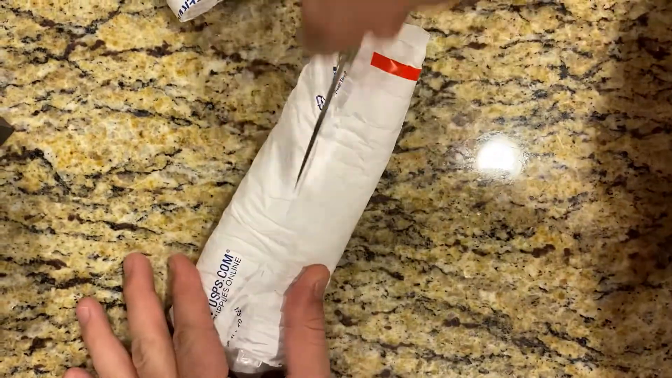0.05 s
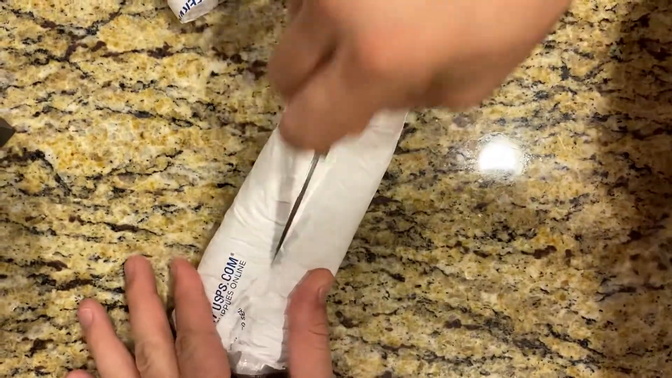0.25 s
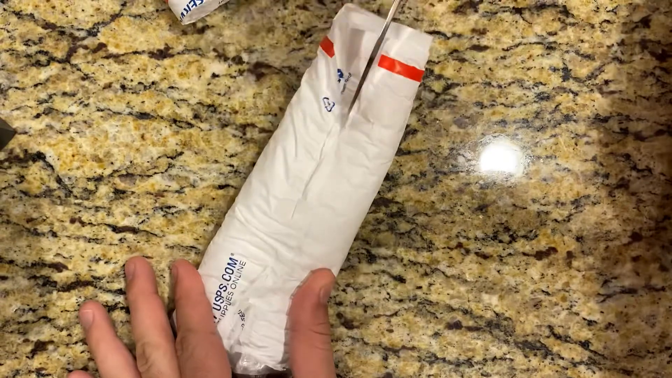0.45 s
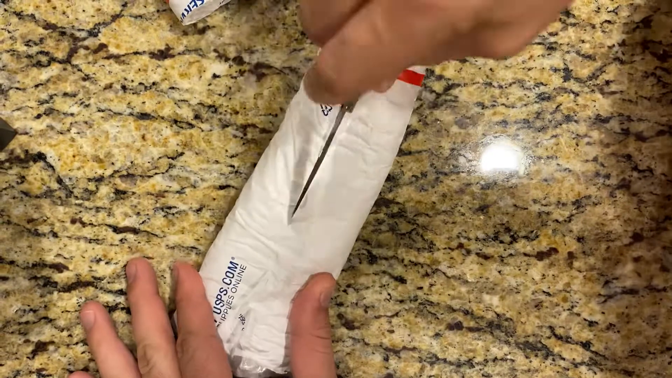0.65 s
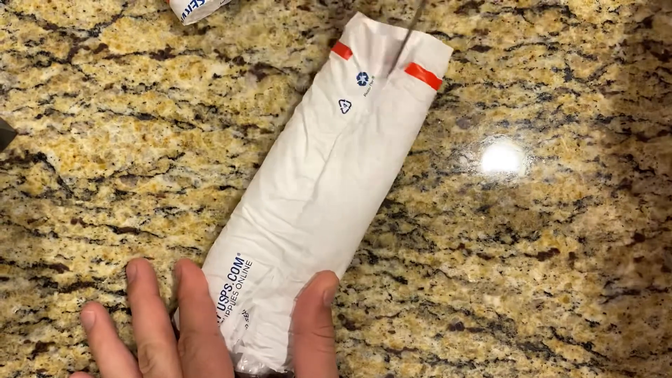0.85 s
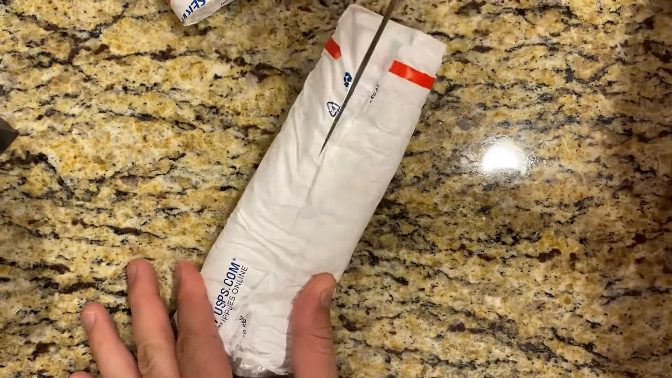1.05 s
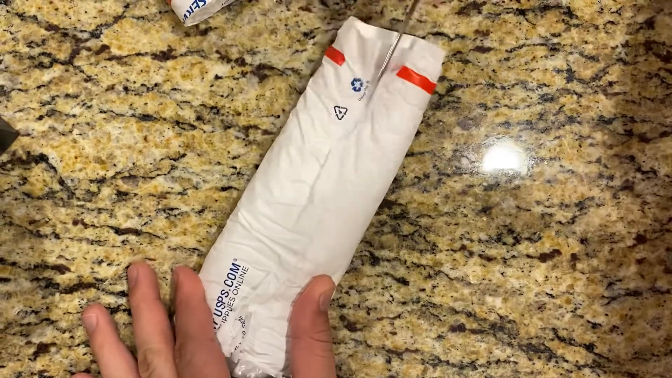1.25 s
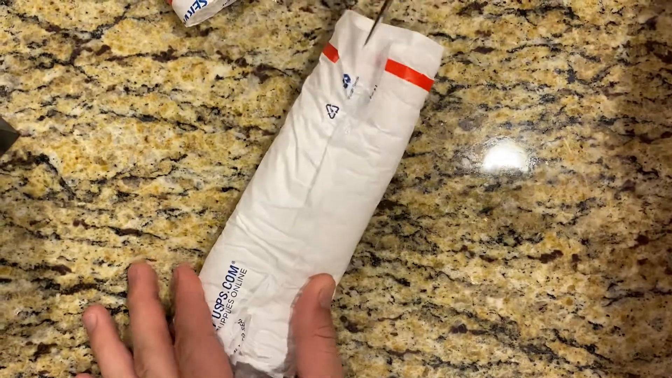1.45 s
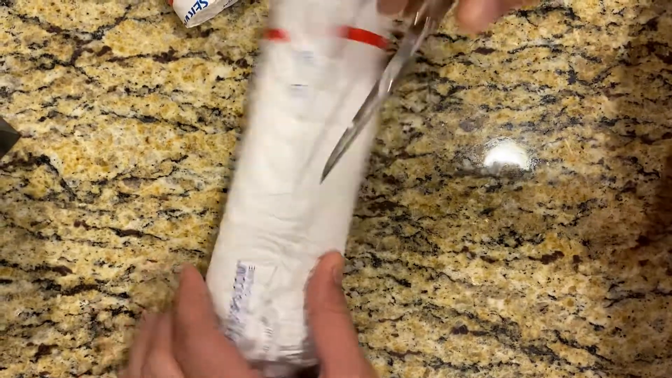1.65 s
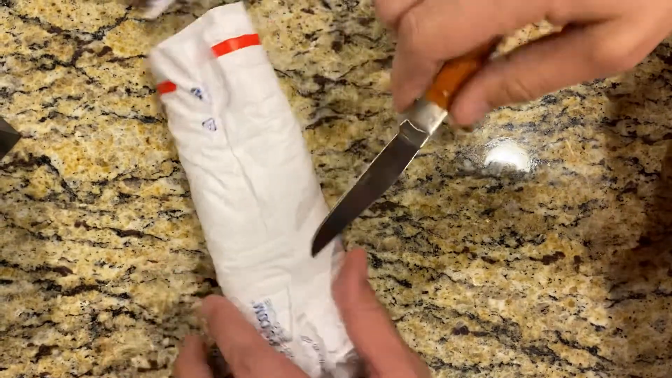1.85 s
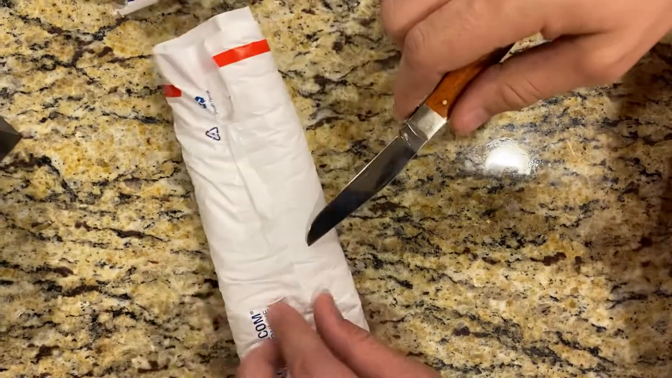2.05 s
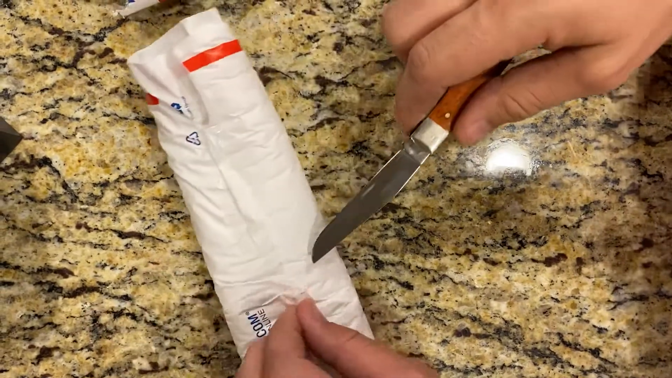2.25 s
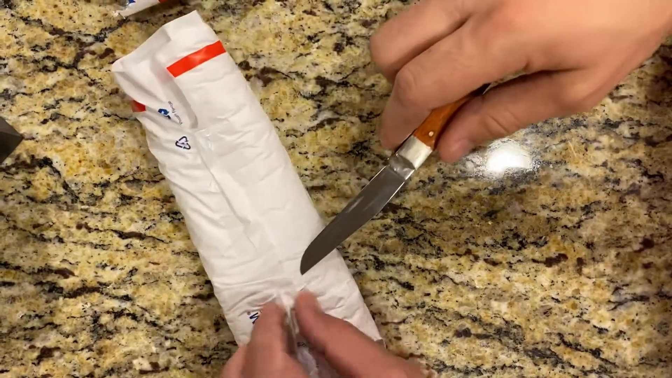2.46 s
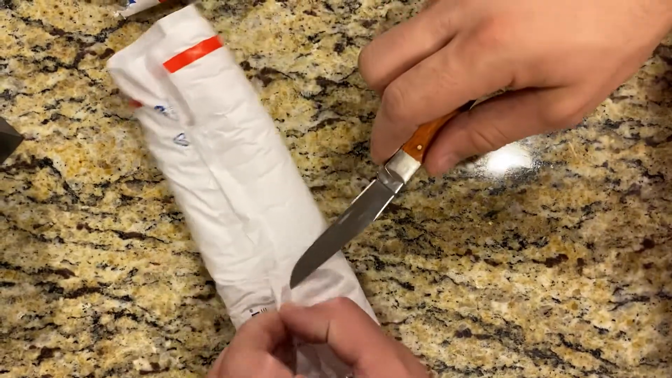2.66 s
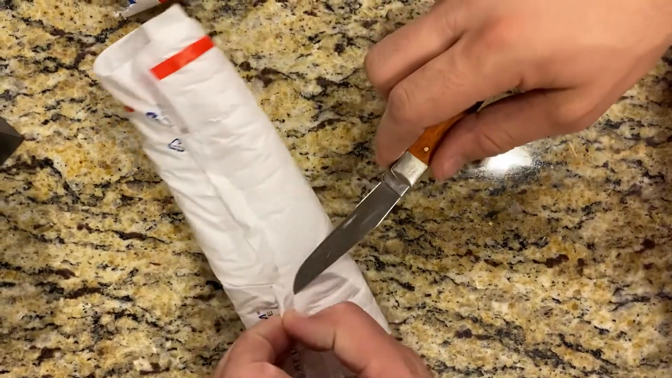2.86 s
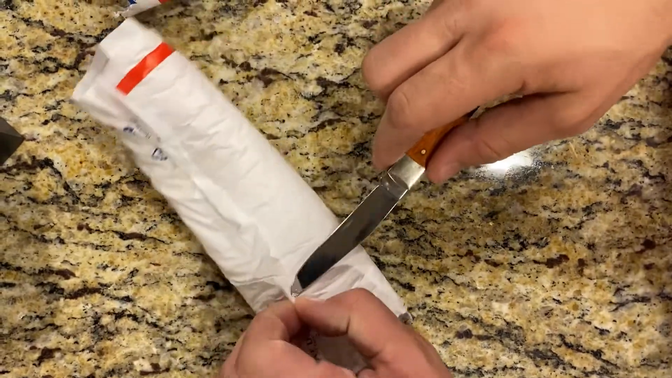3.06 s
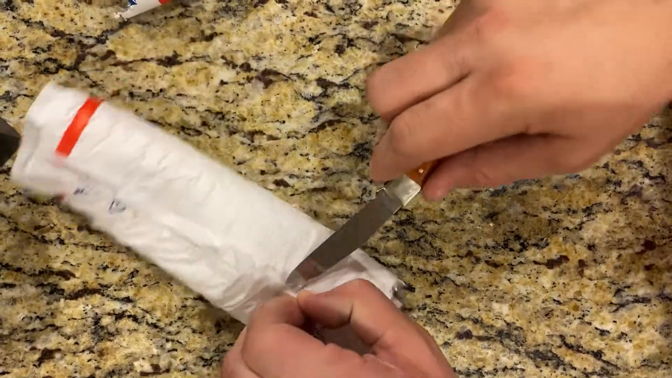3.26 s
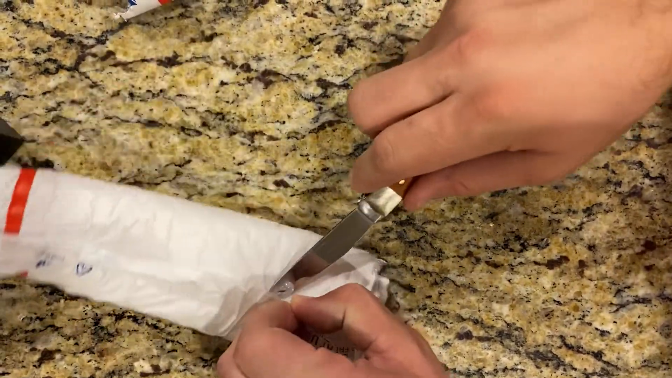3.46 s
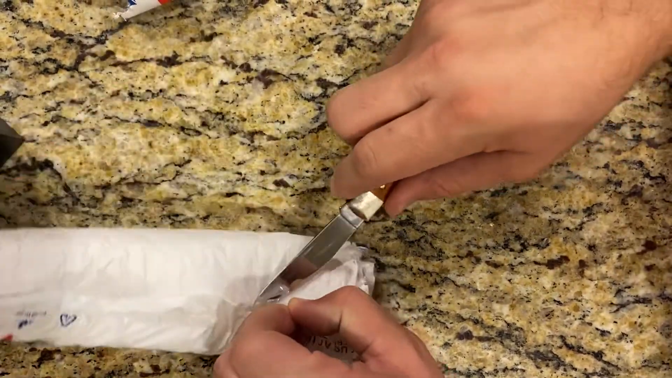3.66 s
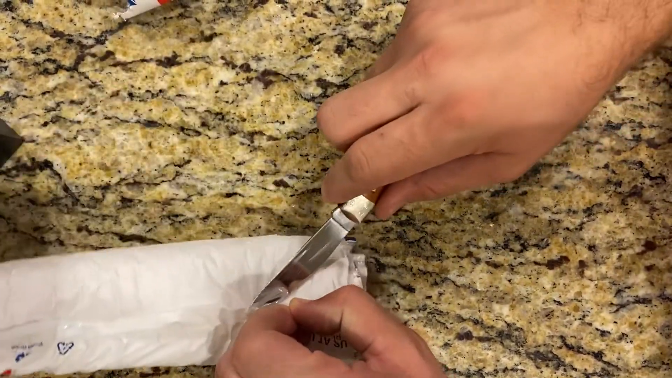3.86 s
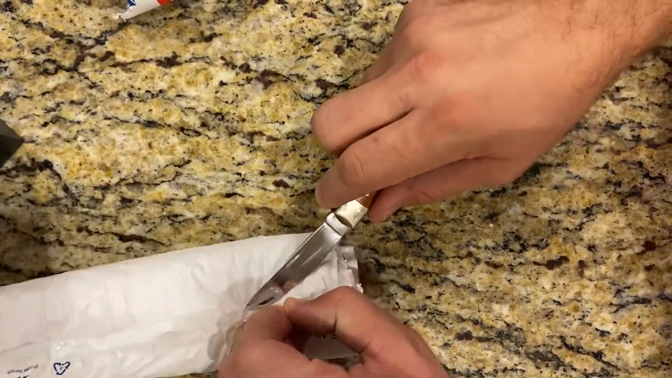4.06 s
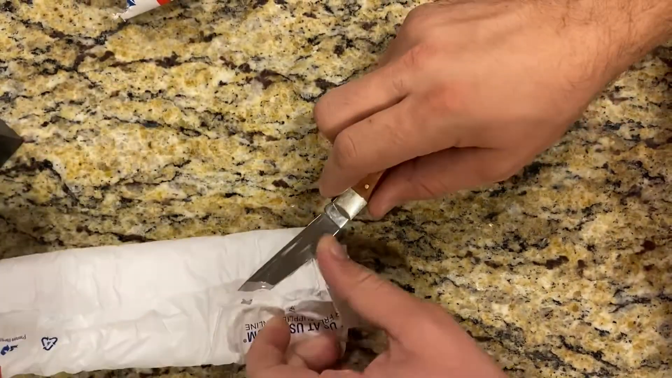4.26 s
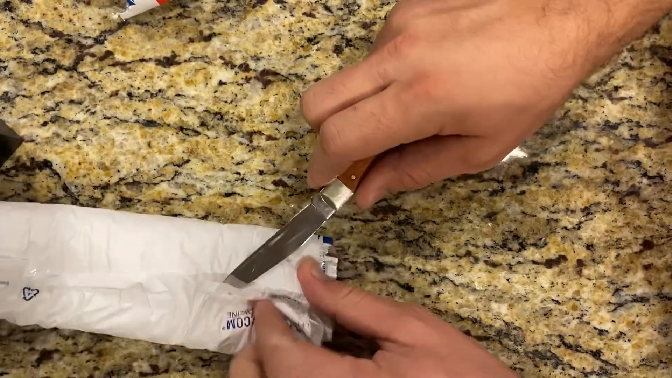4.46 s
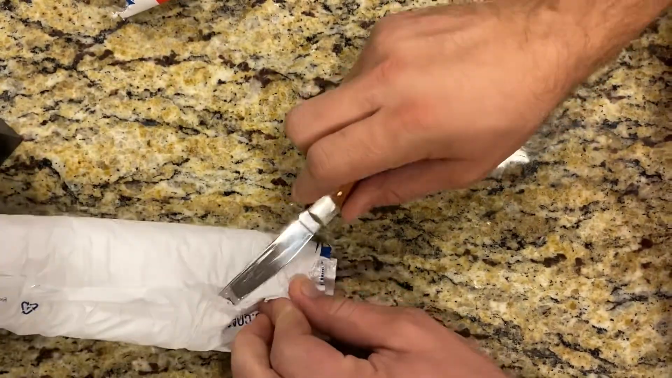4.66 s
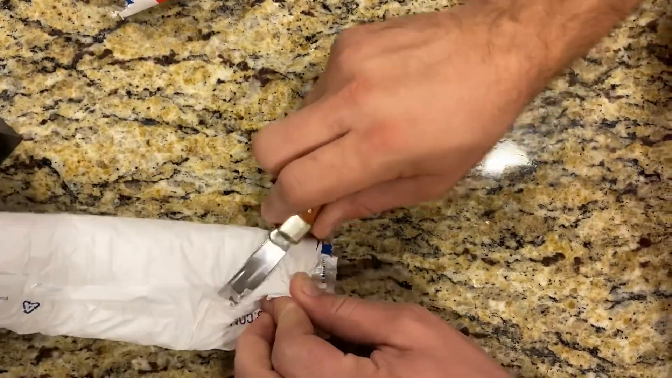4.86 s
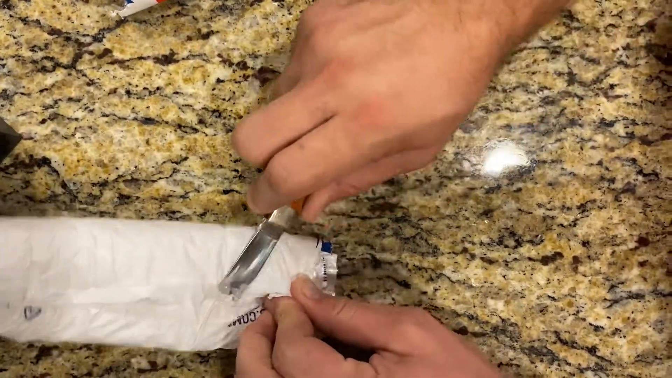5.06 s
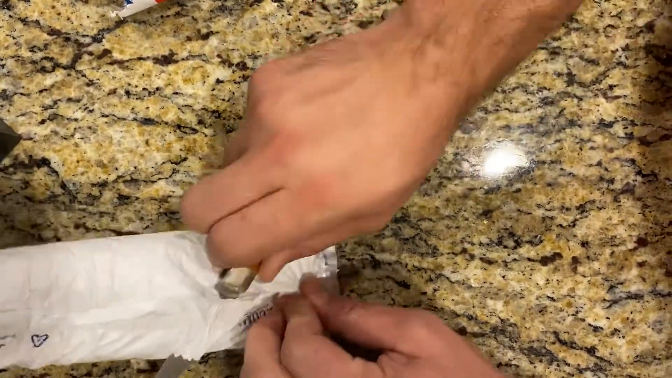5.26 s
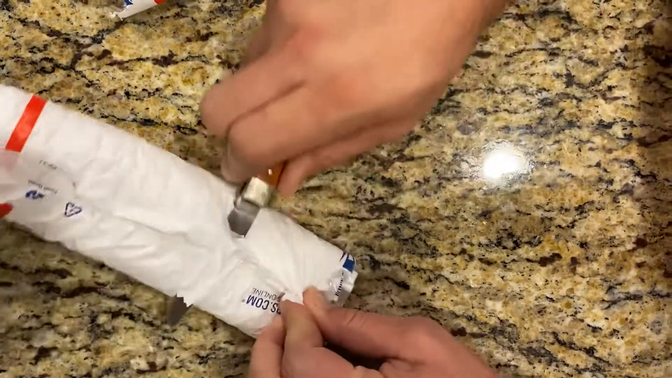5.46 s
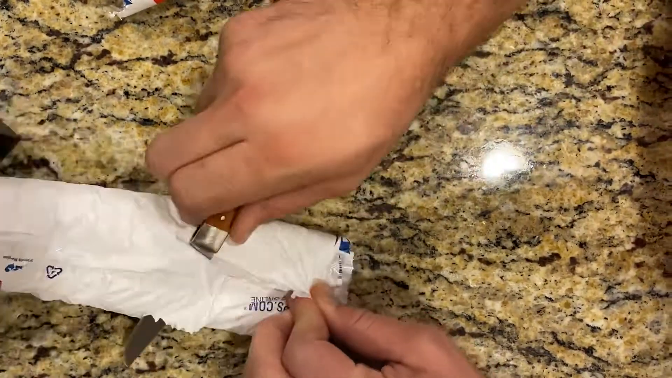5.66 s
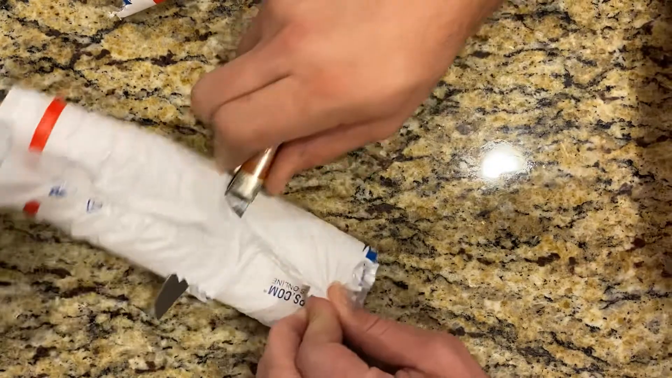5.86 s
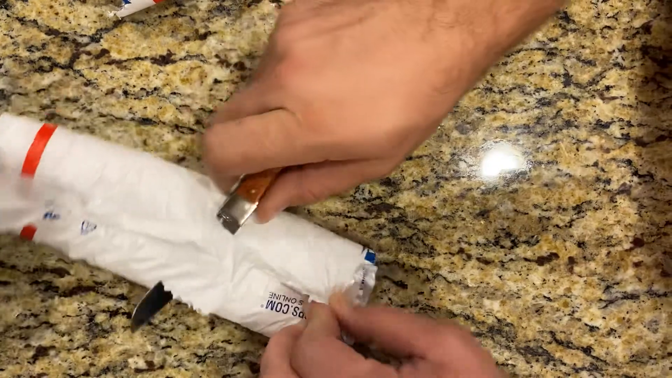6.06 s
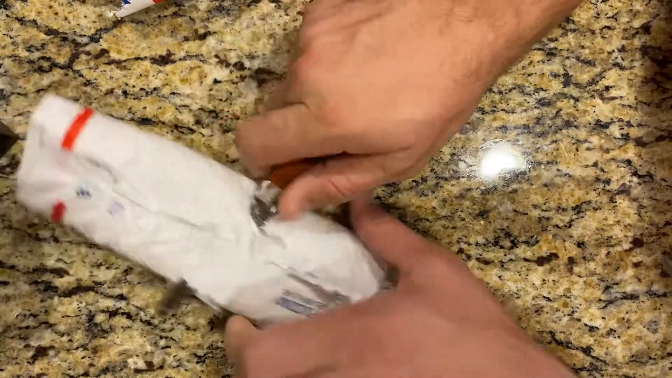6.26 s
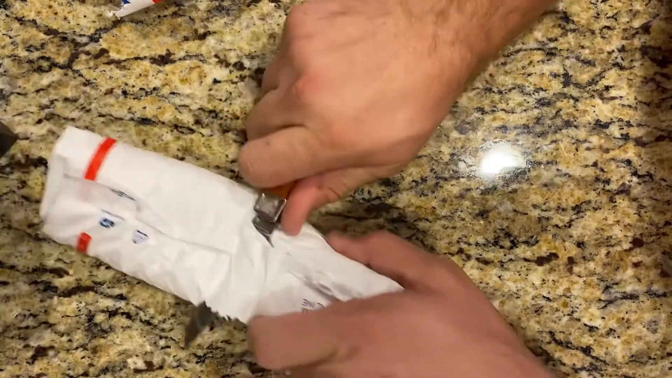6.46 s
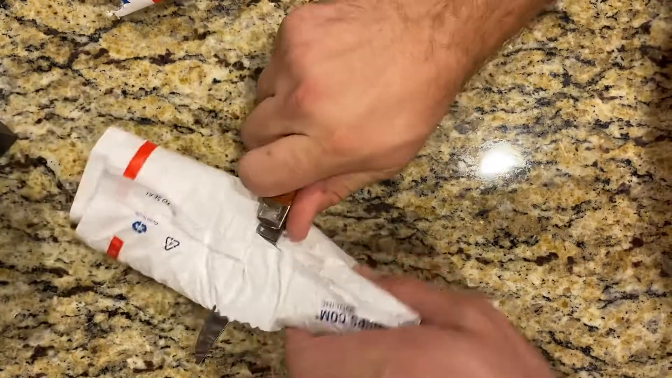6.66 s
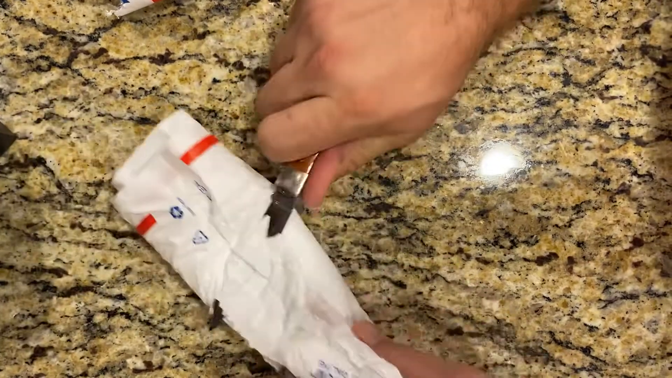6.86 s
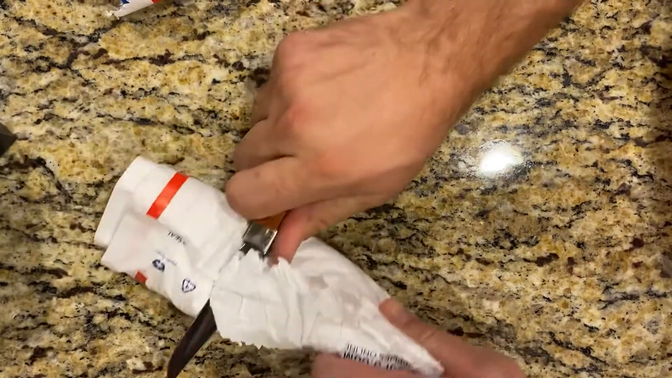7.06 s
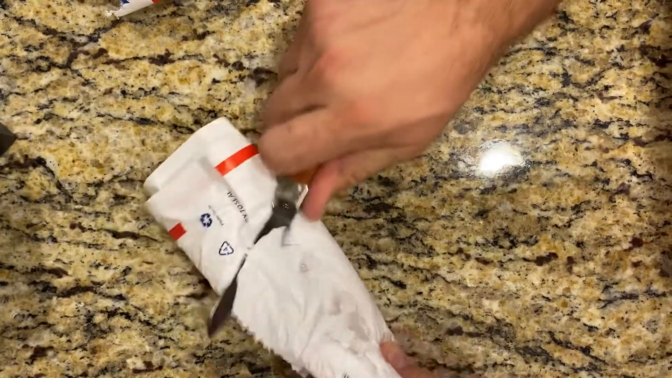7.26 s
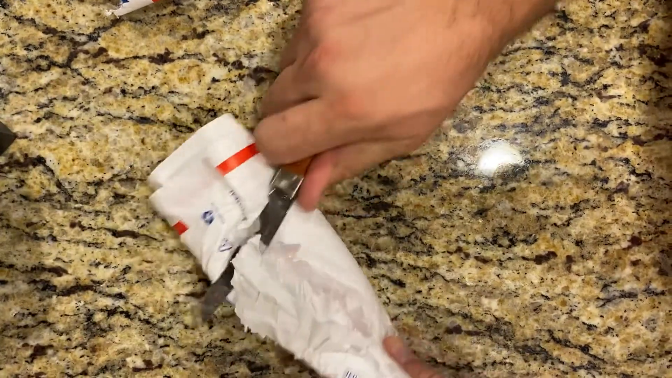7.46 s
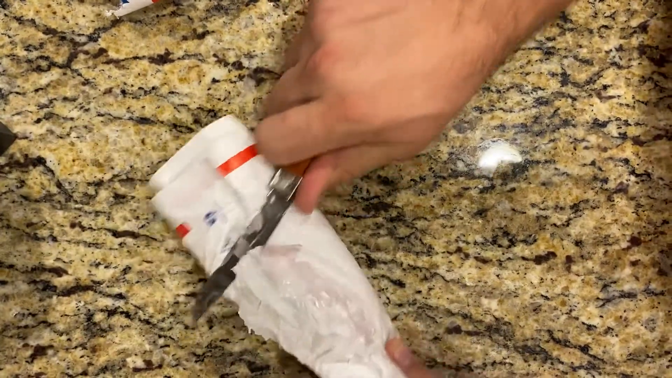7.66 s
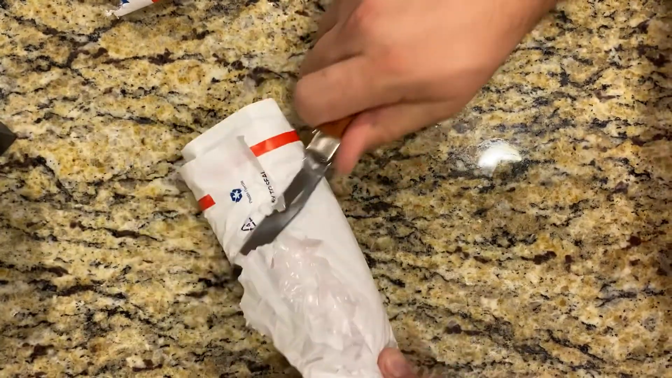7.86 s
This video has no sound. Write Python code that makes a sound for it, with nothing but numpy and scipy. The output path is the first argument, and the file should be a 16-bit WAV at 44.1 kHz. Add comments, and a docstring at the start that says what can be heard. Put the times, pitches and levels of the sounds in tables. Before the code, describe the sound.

A knife works at a padded plastic mailer on a kitchen counter, heard very close in stereo with a slight room tail. Around 0.2, 0.6 and 1.1 seconds the blade pushes in with short, gritty, rasping swishes, each with a soft low thud and crisp crackles. From 1.4 to about 4 seconds handling is quiet: sparse ticks, faint rustles and small crinkles over a low, barely audible rumble, with isolated snaps near 3.1 and 4.1. Crinkling thickens after 4.3, and a bright sharp snap and short rip come at 4.7. Squeezes crunch at 5.2 and 5.4, then a tear pops at 5.6. After a calmer second, crackling builds from 6.3 to the loudest ripping cluster at 6.8, with heavy padded thumps. More tears follow at 6.95 and 7.2, then uneven crumpling fades gently towards 7.9.

```python
"""A knife slides into a plastic mailer on a stone counter, then hands pull the film and the blade tears it.
The film is shaped noise over thousands of tiny ringing ticks, gated by a grip that sticks and slips.
Creases buckle in sharp noise cracks with falling panel flaps, and low jolts thump the padded bag.
The bag rings faintly, and a close two-port microphone hears it all in a small, quiet kitchen."""
import sys
import numpy as np
from scipy import signal
from scipy.fft import rfft, irfft, next_fast_len
from scipy.io import wavfile
from scipy.ndimage import map_coordinates

SR = 44100
rng = np.random.default_rng(int(sys.argv[2]) if len(sys.argv) > 2 else 0)


def master_out(mix):
    """Clip the mix to full scale and print it as 16-bit PCM to the path in sys.argv[1]."""
    frames = np.transpose(np.atleast_2d(mix))
    ceiling = np.clip(frames, -1, 1)
    pcm = np.round(ceiling * 32767).astype(np.int16)
    wavfile.write(sys.argv[1], SR, pcm)


N = 348816

# blade strokes into the mailer: start_s, length_s, level_db, slowing_db_per_s, body_db (against the level)
BLADE_STROKES = [(0.212, 0.27, -31.5, 93.5, -1.5), (0.631, 0.32, -30.5, 74, -3.5),
                 (1.097, 0.283, -34.5, 92, -1.5)]
# each stroke catches on the opening, speeds up, slows and stops; CATCH_DB is against the stroke
CATCH_DB, CATCH_S = -9, 0.0087
PUSH_S, PUSH_DB_PER_S, STOP_DB_PER_S = 0.095, 187, 330
# film tearing along the blade: start_s, length_s, level_db, body_db (against the level)
FILM_TEARS = [(4.683, 0.02, -32.5, -6.5), (5.562, 0.04, -35, 0), (6.769, 0.065, -32.5, -1),
              (6.964, 0.055, -35.5, -1), (7.191, 0.086, -37.5, -3)]
# film that catches or tears starts at once and then settles
ONSET_DB_PER_S, SETTLE_DB_PER_S = 2600, 278
# swells of the handling: squeezes and pulls of the fingers, plus the fading end of a blade stroke at 0 s and
# the bag set down at 1.97 s: peak_s, length_s, level_db, body_db (against the level)
FINGER_SQUEEZES = [(0.0, 0.061, -37.5, 1), (1.428, 0.065, -53.5, 3), (1.684, 0.3, -50.5, -4.5),
                   (1.973, 0.069, -50.5, 1.5), (2.09, 0.22, -46.5, -7), (2.35, 0.16, -51, -10),
                   (2.49, 0.19, -48, -5), (2.624, 0.14, -43.5, -5), (2.944, 0.15, -46, -14.5),
                   (3.356, 0.42, -54.5, -12), (3.607, 0.17, -52, -5.5), (4.165, 0.15, -45.5, -1.5),
                   (4.341, 0.049, -42, -4.5), (4.428, 0.1, -41.5, -9), (4.547, 0.12, -42.5, -7),
                   (4.646, 0.093, -41.5, -9.5), (4.956, 0.17, -50.5, -4), (5.08, 0.035, -42, -1),
                   (5.168, 0.12, -33, -3), (5.332, 0.068, -38, -6.5), (5.408, 0.092, -41.5, 2.5),
                   (5.743, 0.1, -44, -2), (5.921, 0.15, -46.5, 2.5), (6.112, 0.21, -43, -8.5),
                   (6.342, 0.14, -36.5, -5.5), (6.417, 0.13, -34.5, -9), (6.527, 0.14, -31, -6.5),
                   (6.642, 0.18, -43.5, -2), (7.131, 0.083, -36, -6), (7.483, 0.15, -38, -9),
                   (7.657, 0.12, -37.5, -6.5), (7.893, 0.29, -41.5, -1.5)]
# a squeeze swells and fades: share of its length spent rising, level at its ends, roundness of the top
SQUEEZE_RISE, SQUEEZE_ENDS_DB, SQUEEZE_ROUND = 0.5, -12, 1.38
# faint rustle of the held bag between squeezes: time_s, level_db
HOLD_RUSTLE = [(0, -62.5), (1.0, -57), (1.501, -56.5), (1.92, -84), (2.4, -58.5), (3.3, -57), (3.98, -59.5),
               (4.3, -52.5), (4.87, -59.5), (5.3, -41), (6.0, -56), (6.95, -39), (7.4, -50.5), (7.9, -46.5)]
HOLD_BODY_DB = -12  # against the rustle
# smooth sliding against crumpling: time_s, hiss_db (relative to the ticks)
SLIDING_HISS = [(0, -4), (1.4, 0), (2.95, 0), (3.2, -7), (4.2, -6), (4.35, 5), (4.6, -2), (6.2, 0),
                (7.9, -2)]
# stick and slip: decay of a slip, share of the power in steady sliding
SLIP_S, STEADY_SHARE = .0016, .52
# changes of grip a second, their swing, and the swing of each facet
GRIP_PER_S, GRIP_DB, FACET_DB = 70, 1.1, 3
# shifting folds recolour the rustle: swing, width of a patch, its life
FOLD_DB, FOLD_OCTAVES, FOLD_S = 2.6, .25, .02
# loudest buckling creases: time_s, crack_energy_db, flap_energy_db, crack_tilt_db_per_octave
LOUD_CREASES = [(0.0032, -13, -15, -13), (0.0335, -22, -33, -6), (0.0665, -12.5, -19, -18),
                (0.0741, -17.5, -22, -2), (0.1889, -11, -15, 0), (0.2597, -18, -11, 7),
                (0.3036, -7.5, -17, -5), (0.3145, -2.5, -13.5, -6), (0.3479, -4, -18, -11),
                (0.4657, -14, -11, -5), (0.6302, -5, -11.5, -7), (0.6472, -7.5, -8, -18),
                (0.7286, -9, -14.5, -10), (0.7568, -7.5, -7.5, -11), (0.7801, -9, -13.5, -5),
                (0.9474, -14.5, -27, -7), (1.1107, -8, -11.5, -6), (1.154, -9, -16.5, -7),
                (1.1811, -5, -13.5, -6), (1.1882, -9, -15, -5), (1.2188, -11, -14.5, -13),
                (1.3092, -12.5, -22, -4), (1.3303, -5.5, -15, -4), (1.3697, -12, -14.5, -5.5),
                (1.6401, -24.5, -17.5, 11), (1.7459, -29, -22, -11), (1.9486, -15, -21, -18),
                (1.9516, -17.5, -14, -13), (2.0167, -28, -28, -11), (2.1016, -19, -20, -9),
                (2.1066, -25, -19, -4), (2.3051, -22, -19, -21), (2.4935, -22.5, -24.5, -24),
                (2.5062, -13.5, -16, -28), (2.6079, -16, -19, -9), (2.6225, -24, -21, 0),
                (2.7035, -24.5, -29, -19), (2.7832, -19.5, -23.5, -7), (2.8718, -19.5, -35, 2),
                (3.0606, -10, -18.5, -2), (3.1188, -21, -19, 1), (3.2346, -26.5, -22.5, 12),
                (3.2503, -22, -41, 3), (3.3728, -22.5, -40, -1.5), (3.5702, -24.5, -30.5, -11),
                (3.6039, -12.5, -32, 3.5), (3.7439, -26, -20, -5), (3.812, -18.5, -22.5, -6),
                (3.883, -20, -36.5, 5), (3.9483, -25, -43, 9), (4.1279, -7, -20.5, 3),
                (4.1595, -19.5, -14.5, 4), (4.1743, -17, -12.5, 4), (4.3968, -22.5, -18.5, -20),
                (4.4722, -12.5, -12.5, 5), (4.4951, -17, -19.5, -6), (4.5537, -12.5, -22, -2),
                (4.5984, -20, -20, 0), (4.6407, -19.5, -19, -8), (4.6543, -7.5, -27, 9),
                (4.6834, 2, -6.5, -1), (4.6873, 0, -8, 17), (4.7077, -0.5, -10, 1),
                (4.9086, -9.5, -10.5, -8), (4.9444, -12.5, -32, -4), (5.0411, -3, -18, -2.5),
                (5.058, -14, -21.5, -2), (5.0732, -4.5, -13, -8), (5.1767, -9, -4, -7.5),
                (5.313, -12, -28, -3), (5.4005, -2.5, -3, -1), (5.4231, -11, -12.5, -17),
                (5.5334, -12, -17, -5.5), (5.5764, -3, -0.5, -1.5), (5.6046, 0.5, 4.5, -4),
                (5.7592, -6.5, -24, 3.5), (5.7798, -5.5, -29, 7), (5.9099, -17.5, -9.5, -12),
                (5.9358, -10.5, -8, -7.5), (6.0535, -19, -19, -23), (6.241, -20.5, -17.5, -22),
                (6.2699, -19, -12, 1), (6.3333, -13, -6.5, -5), (6.4556, -5, -12, 1.5),
                (6.4894, -5, -5.5, -2), (6.5068, -1, -13.5, -9), (6.5137, -1.5, -5, -3),
                (6.5293, 3.5, 0.5, -11.5), (6.5473, -2.5, -2, -2.5), (6.7194, -12, -26.5, -10),
                (6.7725, 5, 1.5, -9.5), (6.7841, 4, -30, -12), (6.7917, 4.5, 6.5, -10.5),
                (6.7997, 2.5, -1, -7), (6.8061, -2.5, -7.5, -5), (6.819, -4.5, 0.5, 3),
                (6.8352, 4, 7.5, -8), (6.8453, 0.5, 0.5, -1), (6.8532, -0.5, -4, -7),
                (6.8558, -3.5, -4.5, 4), (6.9634, 0, 2.5, 5), (6.9986, -5.5, -12.5, 4),
                (7.0965, -7, -19.5, 2), (7.1237, -12.5, -17.5, -2), (7.1305, -10, -18, -4.5),
                (7.1744, -7.5, -16.5, -2), (7.1976, 1.5, 5.5, -6), (7.2232, 3, -0.5, -3.5),
                (7.2321, -5, -9, -2), (7.2397, -3, -12, -9), (7.2463, -0.5, 3, -5), (7.2506, -4, -4, -4),
                (7.2531, -6.5, -4.5, -5), (7.3595, -13.5, -12, 2.5), (7.4862, -7.5, -7.5, -10),
                (7.5013, -4.5, -6.5, -5), (7.5115, -7, -8.5, 1), (7.5367, -8.5, -24, -3.5),
                (7.6417, -3, -13, -1), (7.65, -7, -4, -8), (7.675, -10, -20, -9), (7.6983, -2, -3.5, -4),
                (7.719, -9, -11, -3.5), (7.7544, -6.5, -24, 1), (7.7984, -17, -19.5, -1),
                (7.8454, -9.5, -20, -1.5), (7.8595, -15, -8.5, -4)]
# a crease lets go abruptly: build-up, first spike against the crack, crack decay
STRAIN_S, SPIKE, CRACK_S = .0004, 1.15, .0011
LOOSE, LOOSE_S = .45, .005  # loose rattle against the flap, its decay
# chance creases: rate, crack energy over the rustle, flap against crack, scatter of both
CREASES_PER_S, CREASE_OVER_DB, CREASE_FLAP_DB, CREASE_SCATTER_DB = 30, 19.5, -2.5, 2
# reference handling level, and the share of changes from it that the chance creases follow
CREASE_KNEE_DB, CREASE_FOLLOW = -50, .85
# jolts of the whole bag: start_s, energy_db, pitch_hz
BAG_JOLTS = [(0.184, -16.5, 305), (0.63, -6.5, 258), (1.096, -8.5, 302), (1.374, -14, 313),
             (2.299, -21, 592), (3.235, -25, 480), (3.744, -30.5, 536), (4.682, -15, 420),
             (5.176, -25, 150), (6.773, 3.5, 266), (6.793, 0.5, 182), (6.82, -3.5, 233), (6.836, -7, 273),
             (7.199, 0.5, 267), (7.248, -5.5, 248)]
# notes of rubbed hollows: peak_s, length_s, level_db, pitch_hz, glide_octaves_per_s, width_hz
HOLLOW_NOTES = [(2.57, 0.04, -45.5, 1243, 2, 506), (6.556, 0.1, -47.5, 235, -13, 130),
                (7.9, .07, -39.5, 1090, 2, 260.7)]
# spectra of a crack, the film's fizz, the bodies of blade and film, the background: frequency_hz, relative_db
CRACK_SPECTRUM = [(200, -24), (900, -21.5), (2200, 7.5), (2650, 0.5), (3200, 8.5), (5000, 9.5), (8000, 9.5),
                  (11000, 7), (14000, 6.5), (15300, 8.5), (16500, -19)]
FIZZ_SPECTRUM = [(300, -24), (900, -1.5), (1600, -3), (2300, 2), (2650, -1), (3200, 1.5), (5000, 1),
                 (7500, -5), (11000, -1), (14000, -10.5), (15300, -3.5), (16500, -43)]
BLADE_SPECTRUM = [(60, -27), (170, -10.5), (260, 1), (420, 4), (650, -0.5), (1100, -1), (2000, -1),
                  (5000, -26)]
FILM_SPECTRUM = [(60, -23), (170, -11), (420, -4), (650, 1), (1030, 0), (1500, -6.5), (2500, -9),
                 (5000, -58)]
BACKGROUND_SPECTRUM = [(20, -56), (50, 3), (85, 2), (170, -5.5), (400, -8), (4000, -33), (16000, -51)]
# ringing of the stuffed mailer: pitch_hz, relative_db, t60_s
BAG_MODES = [(650, -17, 0.036), (1068, -25, 0.12), (1950, -22, 0.016), (2320, -20, 0.1)]
# decay of the kitchen's tail: frequency_hz, t60_s
KITCHEN_DECAY = [(150, 0.79), (530, 0.13), (1400, 0.38), (3700, 0.42), (10000, 0.008), (16000, 0.15)]
# phase between the microphone ports: frequency_hz, left_lead_radians
PORT_LEAD = [(20, 0), (2300, -.15), (3000, 1.1), (5000, .15), (6000, .8), (6800, 2.6), (8100, 3.6),
             (9400, 5.6), (11400, 6.5), (12200, 7.4), (12900, 9), (14400, 10.1), (16000, 12.2)]
# level between the microphone ports: frequency_hz, left_minus_right_db
PORT_TILT = [(400, 0.6), (800, 4), (1400, 1.4), (2200, 0), (2800, -9), (3400, -0.5), (4100, -2.5),
             (5200, -0.5)]
# low background rumble, louder from 0.8 to 4.3 s: time_s, level_db
BACKGROUND_RUMBLE = [(0, -72), (.8, -63.5), (4.3, -66), (4.45, -72.5), (7.9, -66)]
# how unlike the ports hear treble and body (side against mid), and where the room stops sharing its bass
TREBLE_APART, BODY_APART, SPLIT_HZ = .28, .06, 2000
EDGE_HZ = 16600  # top of the microphone's band


def blade():
    """Each stroke catches on the opening, speeds up, slows and stops."""
    for start, length, db, slowing, body_db in BLADE_STROKES:
        late = np.arange(N) / SR - start - PUSH_S
        speed_db = -20 * np.log10(np.hypot(amp(-PUSH_DB_PER_S * late), amp(slowing * late)))
        yield db + speed_db + burst_db(start, length, STOP_DB_PER_S), body_db
        yield db + CATCH_DB + burst_db(start, CATCH_S, SETTLE_DB_PER_S), body_db


def tears():
    """The film gives way at once, runs along the blade and settles."""
    for start, length, db, body_db in FILM_TEARS:
        yield db + burst_db(start, length, SETTLE_DB_PER_S), body_db


def fingers():
    """The hand keeps hold of the bag and squeezes it again and again; the same swells carry the end of a blade
    stroke and the bag being set down."""
    yield np.interp(np.arange(N) / SR, *np.transpose(HOLD_RUSTLE)), HOLD_BODY_DB
    for s, length, db, body_db in FINGER_SQUEEZES:
        yield db + swell_db(s, length), body_db


def crackle(gains, body_spectrum, per_s, slips_per_s, spread_db, pops, count=12, size=400):
    """Tiny slips and creases, each on a facet of its own pitch, over the hiss of sliding film."""
    now, t = np.arange(N) / SR, np.arange(size) / SR
    level = gains[0] * slips(slips_per_s)
    body_level = level * gains[1] / gains[0]
    hiss = amp(np.interp(now, *np.transpose(SLIDING_HISS)))
    rate = per_s * (level / amp(-40.0)) ** .5  # faster handling buckles more creases
    sizes = amp(spread_db * np.minimum(rng.exponential(1, N), 3)) * rng.choice([-1, 1], N)
    clicks = sizes * (rng.random(N) < rate / SR)
    clicks /= np.sqrt(np.mean(sizes ** 2) * np.maximum(rate, 20) / SR)  # keeps the power even as the rate moves
    facet, ticks, flaps = rng.integers(0, count, N), np.zeros((2, N)), np.zeros(N)
    pitches = zip(np.geomspace(1200, 14000, count), np.geomspace(380, 2200, count))
    for k, (hz, low_hz) in enumerate(pitches):
        strain = evened(amp(FACET_DB * np.tanh(wander(20))))  # moves from facet to facet
        train = clicks * (facet == k) * strain
        ring = unit(np.exp(-t * hz / 1.35) * np.sin(2 * np.pi * hz * t)) * np.sqrt(hz / 6000)
        scatter = unit(noise_pair(2 * TREBLE_APART, size) * np.exp(-t / 0.00019))
        tick = (ring + .5 * scatter) / np.hypot(1, .5)
        ticks += signal.oaconvolve(train[None], tick, axes=1)[:, :N]
        small_flap = flap(t, low_hz, 0.54 / low_hz, glide=0.51, glide_time=0.0021)
        flaps += signal.oaconvolve(train, small_flap)[:N]
    fizz = level * (ticks + hiss * noise_pair(TREBLE_APART, N)) / np.hypot(1, hiss)
    body = colour(body_level * noise_pair(BODY_APART, N), body_spectrum) + pops * body_level * flaps
    return folds(colour(fizz, FIZZ_SPECTRUM) + body / np.hypot(1, pops))


def slips(per_s):
    """The grip sticks and slips: each slip starts at once and dies quickly. Gain of rms 1."""
    kicks = (rng.random(N) < per_s / SR) * rng.random(N)
    power = signal.lfilter([1], [1, -np.exp(-2 / (SLIP_S * SR))], kicks)
    sliding = np.sqrt(STEADY_SHARE + (1 - STEADY_SHARE) * power / power.mean())
    return evened(amp(GRIP_DB * wander(GRIP_PER_S)) * sliding)


def folds(x, size=512):
    """As the folds shift, short-lived resonances come and go across the spectrum."""
    hz, when, z = signal.stft(x, SR, nperseg=size)
    place = np.meshgrid(np.log2(1 + hz / 500) / FOLD_OCTAVES, when / FOLD_S, indexing="ij")
    patches = rng.standard_normal([int(axis.max()) + 2 for axis in place])
    swing = evened(map_coordinates(patches, place, order=1))
    gain = evened(amp(FOLD_DB * swing))
    return signal.istft(z * gain, SR, nperseg=size)[1][:, :N]


def snaps(creases, shiver, shiver_time, panel_hz, cycles, size=1600):
    """Each crease strains, lets go with a crack, flaps its panel and leaves the sheet shivering."""
    t, out = (np.arange(size) - size // 10) / SR, np.zeros((2, N))
    since, strain = np.maximum(t, 0), np.exp(np.minimum(t, 0) / STRAIN_S)
    small = signal.butter(2, 230, "high", fs=SR, output="sos")  # a small panel radiates no bass
    soft = signal.butter(1, 5000, fs=SR, output="sos")  # the shiver loses its treble
    for s, crack_db, panel_db, tilt_db in creases:
        burst = unit(noise_pair(TREBLE_APART, size) * strain * np.exp(-since / CRACK_S))
        after = unit(noise_pair(2 * TREBLE_APART, size) * strain * np.exp(-since / shiver_time))
        raw = SPIKE * (t == 0) + burst + shiver * unit(signal.sosfilt(soft, after))
        crack = unit(colour(raw, CRACK_SPECTRUM, tilt_db))
        # wide panels flap harder and lower
        hz = panel_hz * 2 ** ((crack_db - panel_db) / 52 + 0.12 * rng.standard_normal())
        panel = flap(since, hz, cycles / hz, glide=0.99, glide_time=0.00057, sag_per_s=152)
        panel *= rng.choice([-1, 1])  # buckles in or out
        rattle = noise_pair(BODY_APART, size) * strain * np.exp(-since / LOOSE_S)
        slack = unit(colour(rattle, FILM_SPECTRUM))
        panel = unit(signal.sosfilt(small, panel + LOOSE * slack))
        add(out, s + t[0], amp(crack_db) * crack + amp(panel_db) * panel)
    return out


def lesser_creases(level, count=320):
    """Small snaps at random moments, stronger when the handling is."""
    rows = []
    chance = rng.standard_normal((count, 3))
    times = np.cumsum(rng.exponential(1, count)) / CREASES_PER_S
    for s, (crack, panel, sharp) in zip(times, chance):
        if s * SR < N:
            effort_db = CREASE_FOLLOW * (20 * np.log10(level[int(s * SR)]) - CREASE_KNEE_DB)
            db = CREASE_KNEE_DB + effort_db + CREASE_OVER_DB + CREASE_SCATTER_DB * crack
            rows.append((s, db, db + CREASE_FLAP_DB + CREASE_SCATTER_DB * panel, 3 * sharp))
    return rows


def flap(t, hz, rise, glide, glide_time, sag_per_s=0):
    """A bending wave in film: short waves arrive first, so the pitch falls, and sags on as the panel slackens."""
    pitch = hz * (1 + glide * np.exp(-t / glide_time)) / (1 + sag_per_s * t)
    turns = np.cumsum(pitch) / SR
    return unit(t / rise * np.exp(-t / rise) * np.sin(2 * np.pi * turns))


def thumps(rise, rumble, rumble_time, size=4000):
    """The padded bag takes a jolt: a low falling push and a short rumble."""
    t, out = np.arange(size) / SR, np.zeros((2, N))
    for s, db, hz in BAG_JOLTS:
        band = signal.butter(2, [0.73 * hz, 2.47 * hz], "band", fs=SR, output="sos")
        low = signal.sosfilt(band, rng.standard_normal(size) * np.exp(-t / rumble_time))
        push = flap(t, hz, rise, glide=1.29, glide_time=0.0028)
        add(out, s, amp(db) * unit(push + rumble * unit(low)))
    return out


def hollows():
    """Rubbing excites a hollow of the bag, whose note glides as it bends."""
    out = np.zeros(N)
    for s, length, db, hz, glide, width in HOLLOW_NOTES:
        late = np.clip(np.arange(N) / SR - s, -length, length)
        turns = np.cumsum(hz * 2 ** (glide * late)) / SR
        note = wander(width) * np.cos(2 * np.pi * turns) + wander(width) * np.sin(2 * np.pi * turns)
        out += amp(db + swell_db(s, length)) * evened(note)
    return out


def mailer(x, size=5000):
    """The stuffed bag rings faintly with everything that happens on its skin."""
    t = np.arange(size) / SR
    ring = np.zeros(size)
    for hz, db, t60 in BAG_MODES:
        ring += amp(db) * unit(amp(-60 * t / t60) * np.cos(2 * np.pi * hz * t))
    return x + amp(-12.5) * signal.oaconvolve(x.mean(0), ring)[:N]


def ports(x):
    """The direct sound meets the two microphone ports with a phase and level difference that vary with pitch."""
    size = next_fast_len(N + 2000)
    hz = np.fft.rfftfreq(size, 1 / SR)
    half = amp(read(PORT_TILT, hz) / 2) * np.exp(1j * read(PORT_LEAD, hz) / 2)
    return irfft(rfft(x, size) * np.array([half, 1 / half]), size)[:, :N]


def kitchen(x, early_db, early_time, tail_db, size=16000):
    """Quick echoes from the counter and hands, then a short tail; both ports share the bass."""
    t = np.arange(size) / SR
    taps = rng.standard_normal((2, size)) * (rng.random((2, size)) < 3000 / SR) * (t > .0012)
    hz, when, z = signal.stft(taps, SR, nperseg=256)
    same = 1 / (1 + (hz[:, None] / SPLIT_HZ) ** 2)
    z[1] = same * z[0] + np.sqrt(1 - same ** 2) * z[1]
    early = signal.istft(z, SR, nperseg=256)[1][:, :size] * np.exp(-t / early_time)
    decay = amp(-60 * when / read(KITCHEN_DECAY, hz)[:, None])
    tail = signal.istft(z * decay, SR, nperseg=256)[1][:, :size] * (t > .005)
    echoes = amp(early_db) * unit(early) + amp(tail_db) * unit(tail)
    return signal.oaconvolve(x[None], echoes, axes=1)[:, :N]


def background(apart):
    """A faint low rumble: shaped noise of slowly wandering level, much alike at both ports."""
    level_db = np.interp(np.arange(N) / SR, *np.transpose(BACKGROUND_RUMBLE)) + 1.6 * wander(8)
    return amp(level_db) * evened(colour(noise_pair(apart, N), BACKGROUND_SPECTRUM))


def together(gestures):
    """Sums the power of (level curve dB, body dB) pairs into a fizz gain and a body gain."""
    power = np.full((2, N), 1e-14)
    for level_db, body_db in gestures:
        heard = level_db > -110
        power[:, heard] += amp([level_db[heard], level_db[heard] + body_db]) ** 2
    return np.sqrt(power)


def burst_db(start, length, release_db_per_s):
    """Level in dB of a sudden start, a hold and a steady release."""
    since = np.arange(N) / SR - start
    return ONSET_DB_PER_S * np.minimum(since, 0) - release_db_per_s * np.maximum(since - length, 0)


def swell_db(peak_s, length):
    """Level in dB of a rounded swell and fade."""
    u = (np.arange(N) / SR - peak_s) / length
    return SQUEEZE_ENDS_DB * np.maximum(-u / SQUEEZE_RISE, u / (1 - SQUEEZE_RISE)) ** SQUEEZE_ROUND


def noise_pair(apart, size):
    """Crumpled film radiates unevenly, so each port gets a slightly different noise."""
    mid, side = rng.standard_normal((2, size))
    return np.array([mid + apart * side, mid - apart * side]) / np.hypot(1, apart)


def wander(per_s):
    """A random curve of rms 1 that takes per_s new values a second."""
    now = np.arange(N) / SR * per_s
    points = rng.standard_normal(int(now[-1]) + 2)
    return evened(np.interp(now, np.arange(len(points)), points))


def colour(x, spectrum, tilt_db=0, size=2048):
    """Causal filter with the given spectrum, tilted per octave above 2 kHz: attacks stay sharp."""
    hz = abs(np.fft.fftfreq(size, 1 / SR))
    log_gain = np.log(amp(read(spectrum, hz) + tilt_db * np.log2(np.maximum(hz / 2000, 1))))
    minimum_phase = np.exp(np.conj(signal.hilbert(log_gain)))
    taps = unit(np.fft.ifft(minimum_phase).real[:size // 2])
    return signal.oaconvolve(x, taps.reshape((1,) * (x.ndim - 1) + (-1,)), axes=-1)[..., :x.shape[-1]]


def read(points, hz):
    """Reads a table along a log-frequency axis."""
    f, value = np.transpose(points)
    return np.interp(np.log(hz + 1), np.log(f + 1), value)


def amp(db):
    """Decibels to gain."""
    return 10 ** (np.asarray(db) / 20)


def evened(x):
    """Scales to rms 1."""
    return x / np.sqrt(np.mean(x ** 2) + 1e-20)


def unit(x):
    """Scales each channel to energy 1."""
    return x / np.sqrt(np.sum(x ** 2, -1, keepdims=True) + 1e-20)


def add(mix, s, sound):
    """Mixes a sound into both channels at time s."""
    part = mix[:, max(round(s * SR), 0):][:, :sound.shape[-1]]
    part += sound[..., :part.shape[1]]


def scene():
    """Blade, tears, fingers, snaps and thumps sound through the bag into the kitchen."""
    handling = together(fingers())
    pulled = np.hypot(handling, together(tears()))
    film = crackle(together(blade()), BLADE_SPECTRUM, per_s=1200, slips_per_s=290, spread_db=3.5, pops=0.26)
    film += crackle(pulled, FILM_SPECTRUM, per_s=480, slips_per_s=260, spread_db=4.5, pops=0.58)
    creases = [*LOUD_CREASES, *lesser_creases(handling[0])]
    film += snaps(creases, shiver=0.84, shiver_time=0.0042, panel_hz=1103.0, cycles=0.79)
    film += thumps(rise=0.003, rumble=1.0, rumble_time=0.0061) + hollows()
    film = mailer(film)
    echoes = kitchen(film.mean(0), early_db=-24.5, early_time=0.0018, tail_db=-14.0)
    return ports(film) + echoes + background(apart=0.36)


def record(dry):
    """The microphone's band limit: a steep low-pass closes off the top treble."""
    low_pass = signal.firwin(255, EDGE_HZ, window=("kaiser", 9), fs=SR)
    return signal.oaconvolve(dry, low_pass[None], "same")


dry = scene()
out = record(dry)
master_out(out)
```